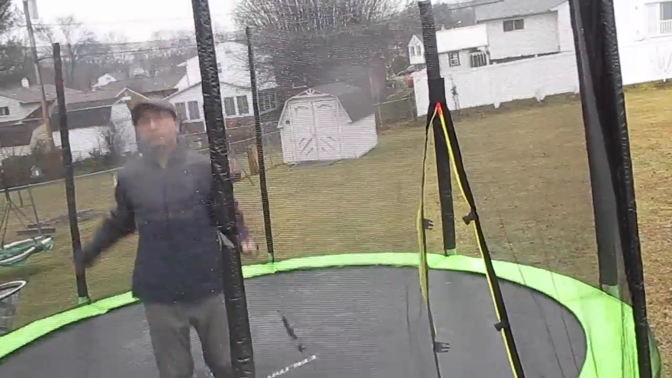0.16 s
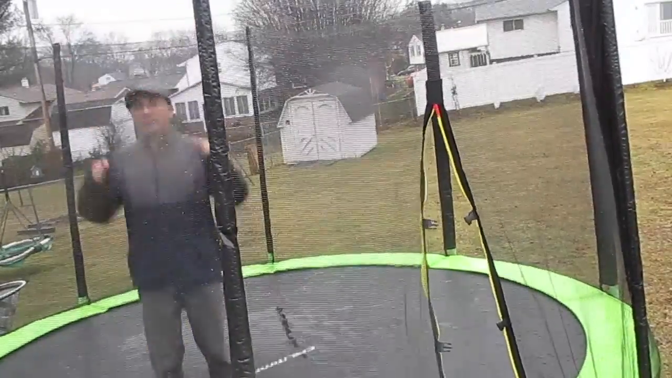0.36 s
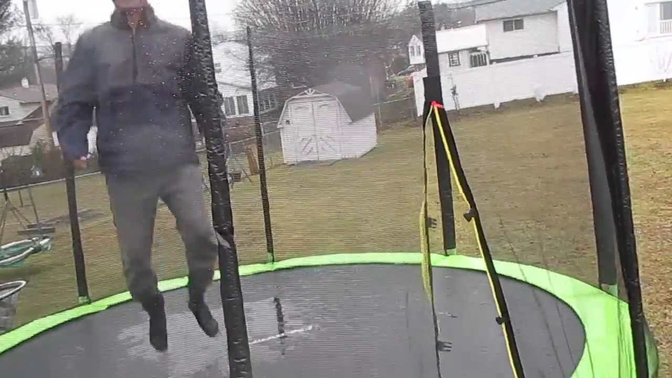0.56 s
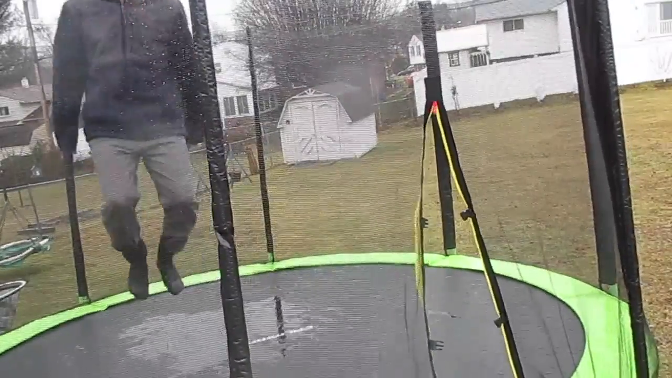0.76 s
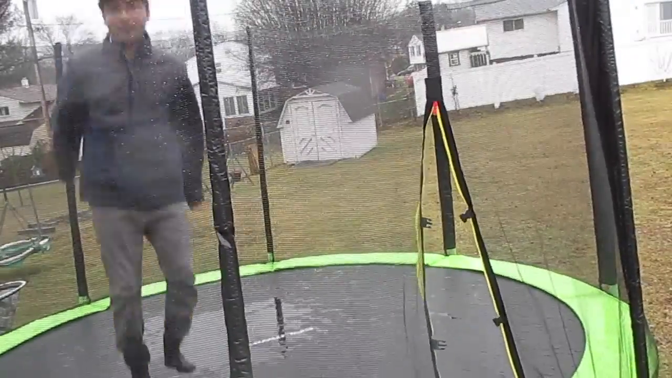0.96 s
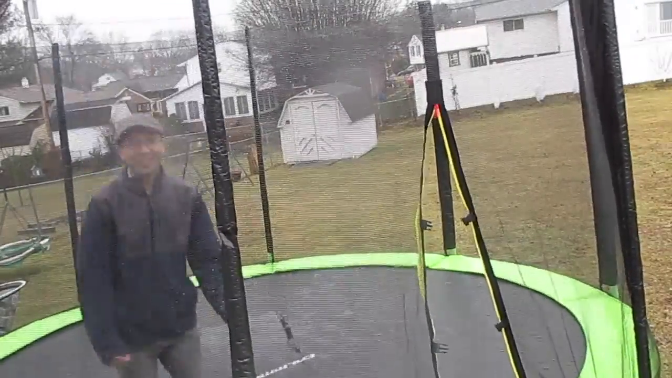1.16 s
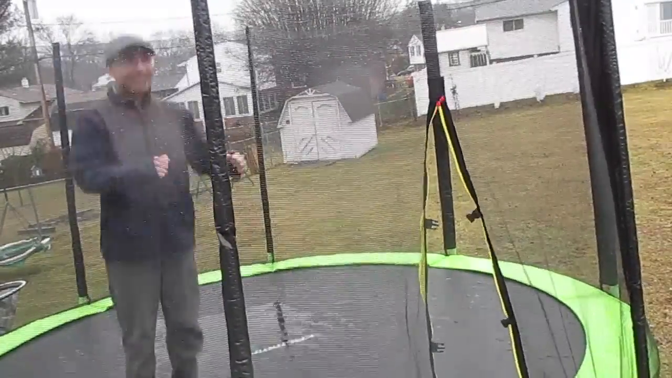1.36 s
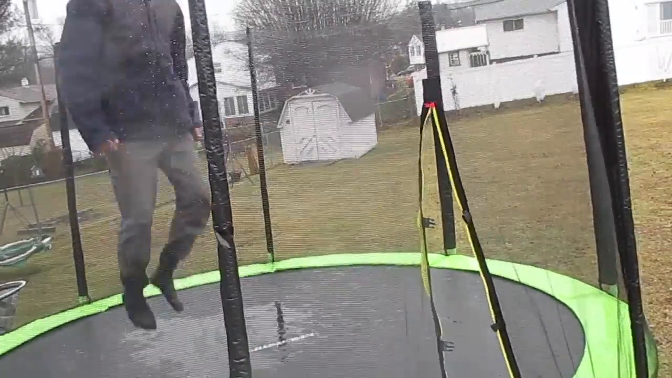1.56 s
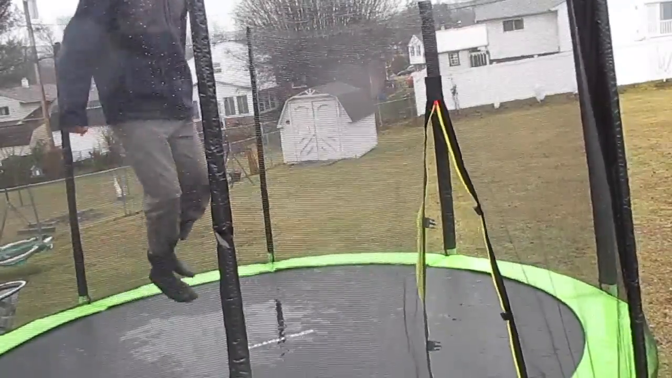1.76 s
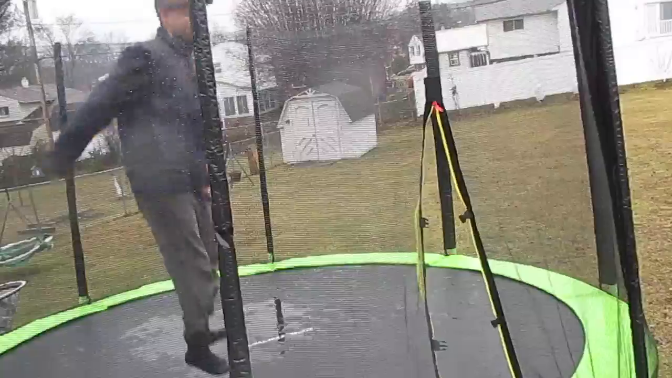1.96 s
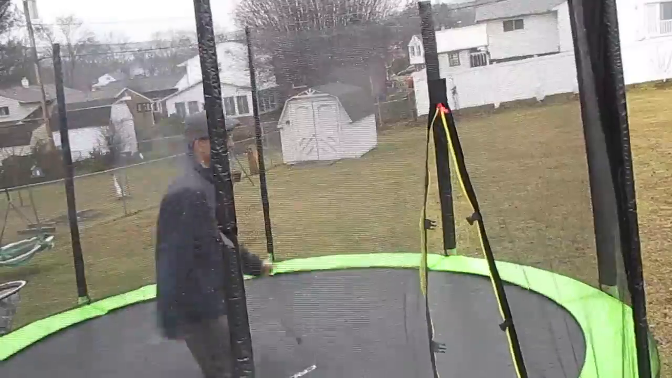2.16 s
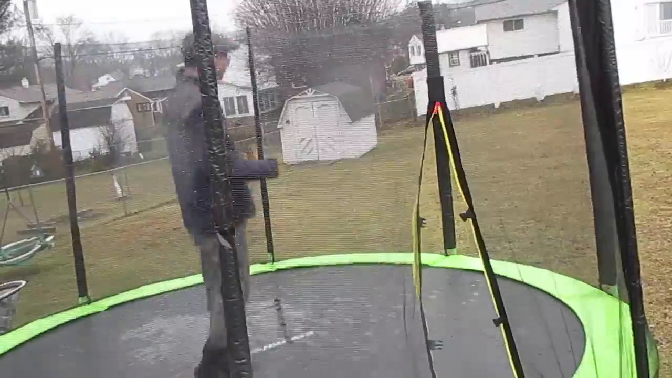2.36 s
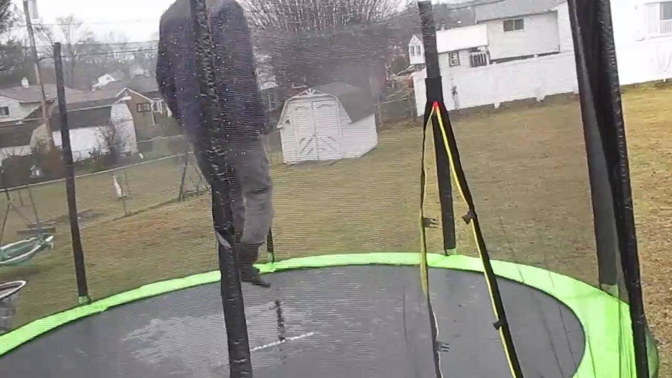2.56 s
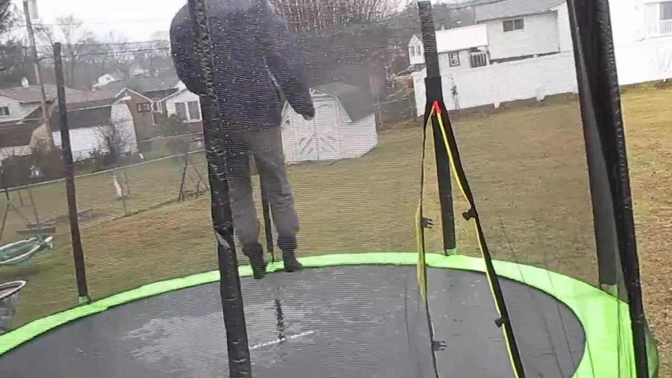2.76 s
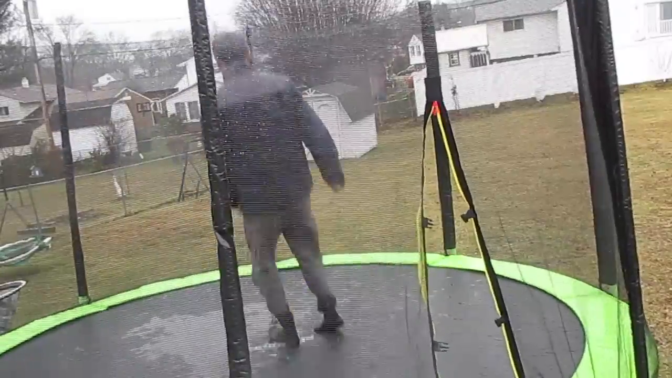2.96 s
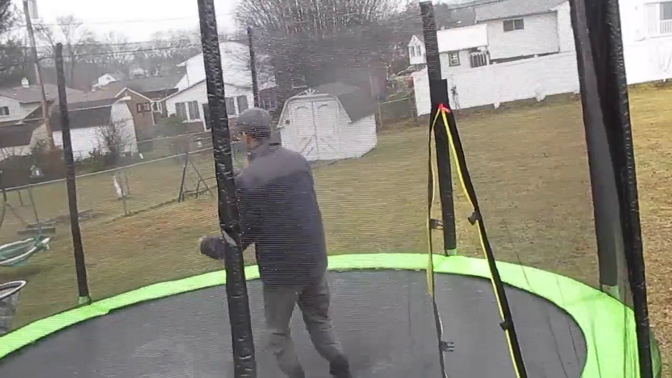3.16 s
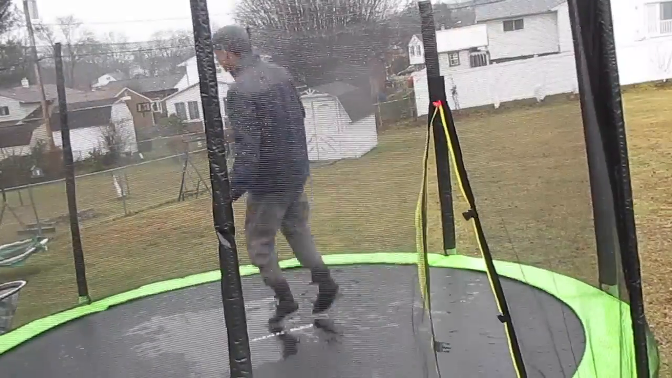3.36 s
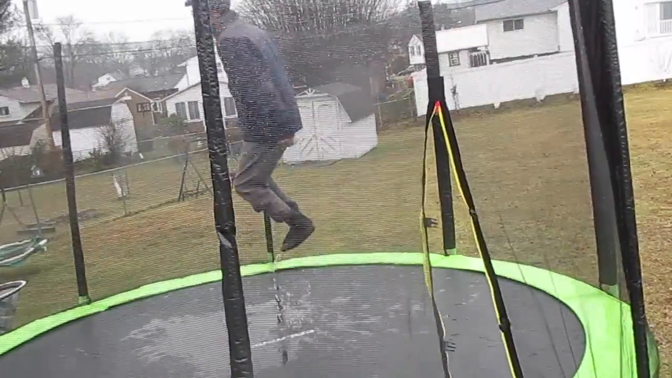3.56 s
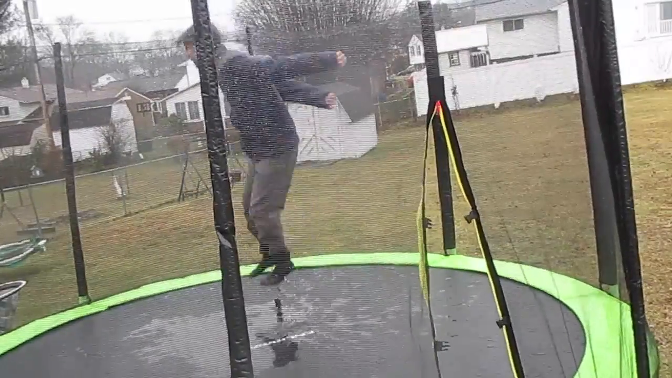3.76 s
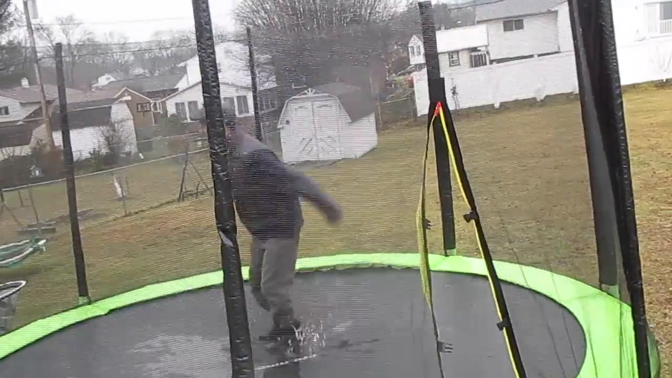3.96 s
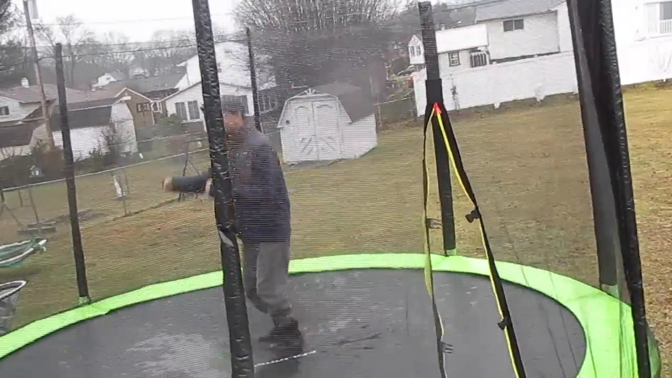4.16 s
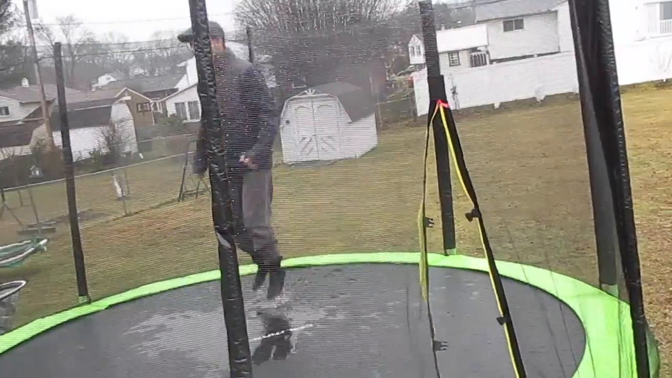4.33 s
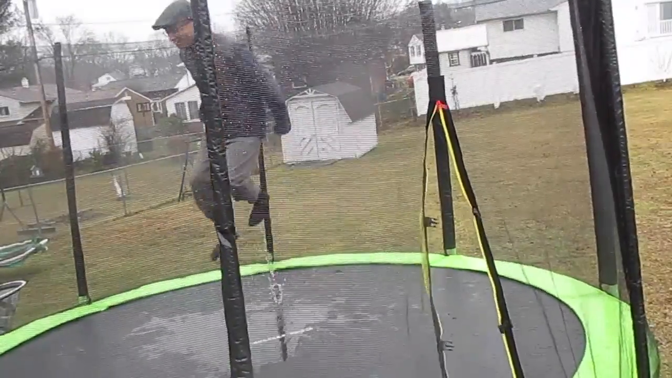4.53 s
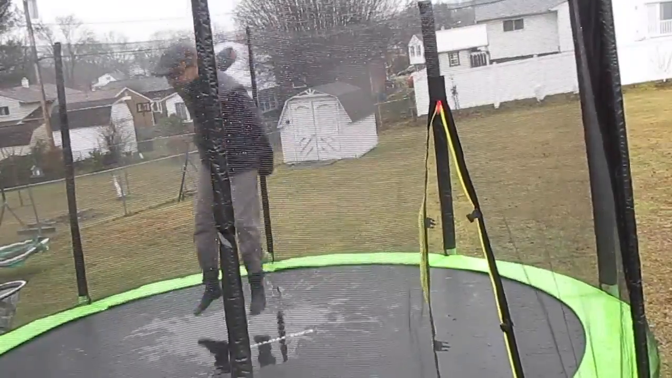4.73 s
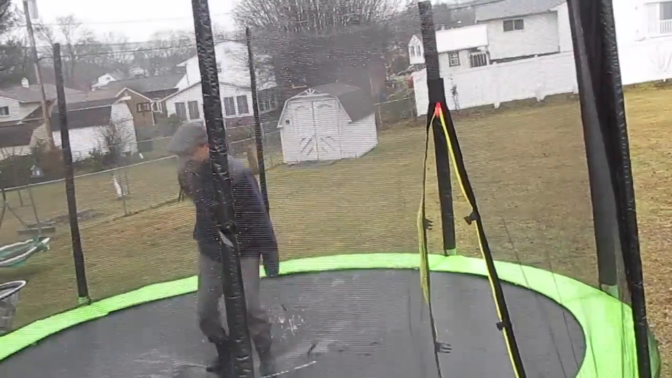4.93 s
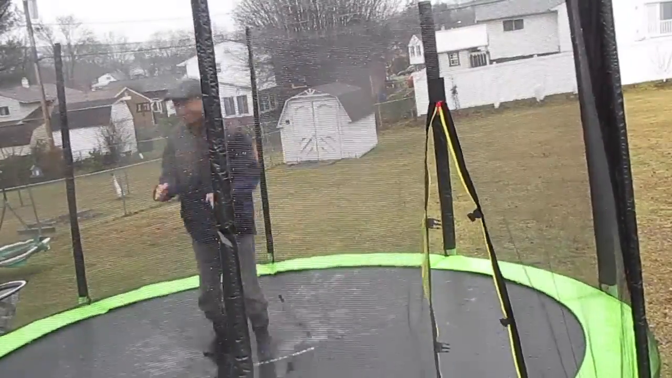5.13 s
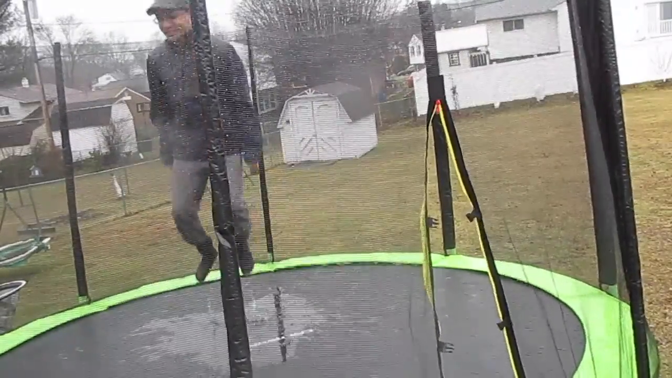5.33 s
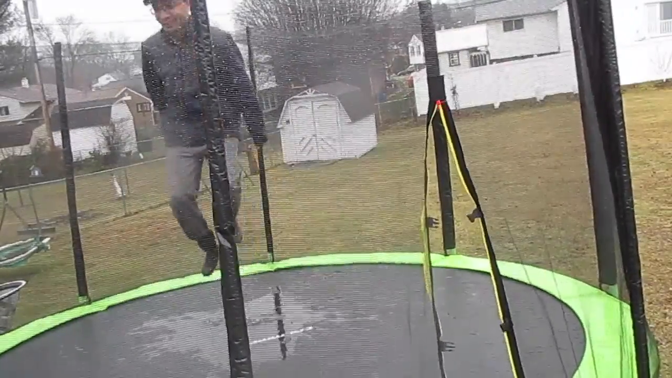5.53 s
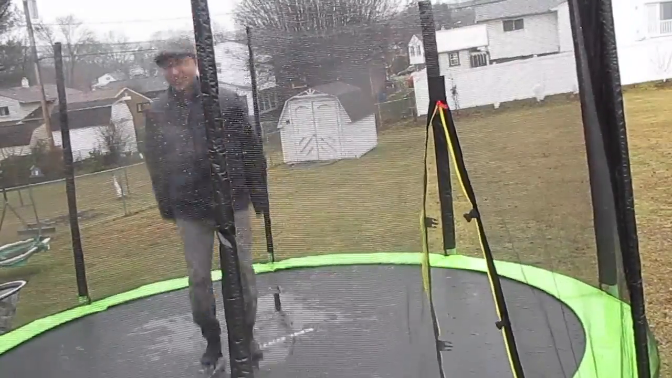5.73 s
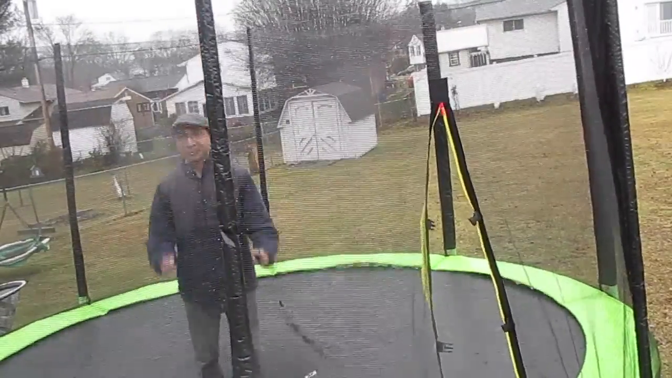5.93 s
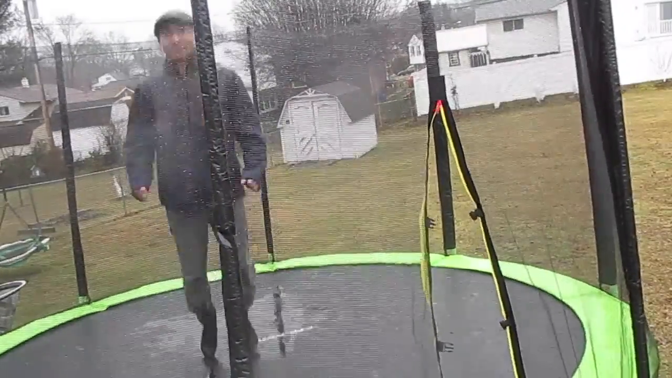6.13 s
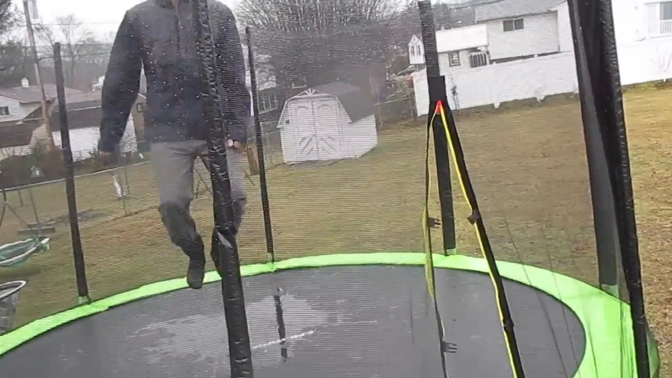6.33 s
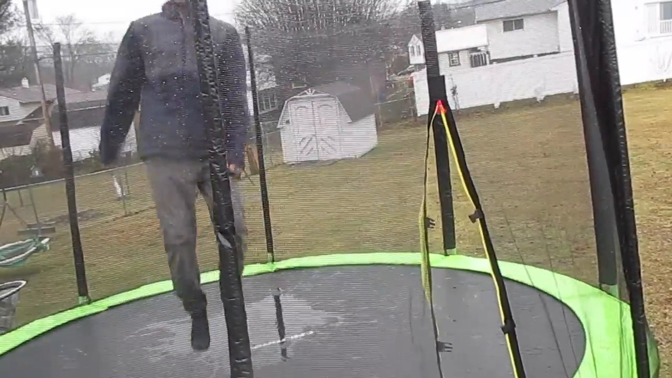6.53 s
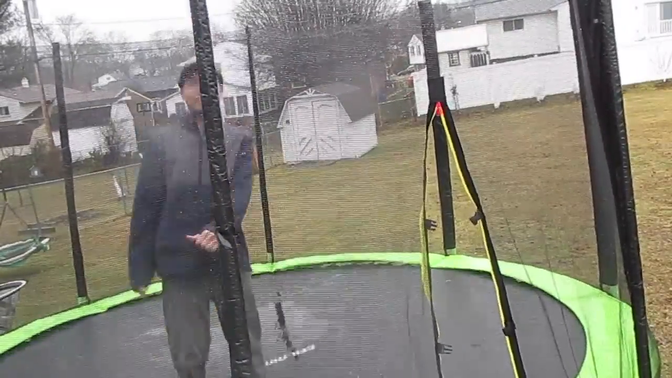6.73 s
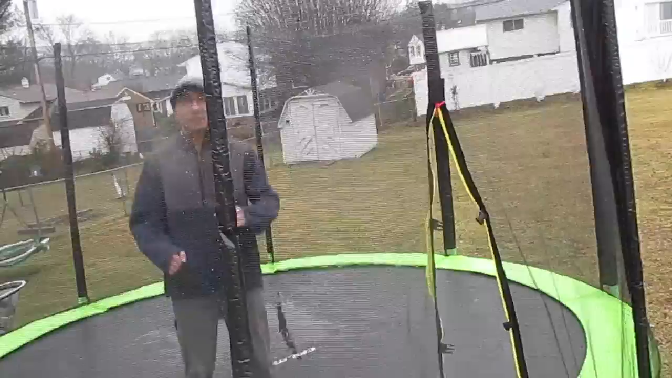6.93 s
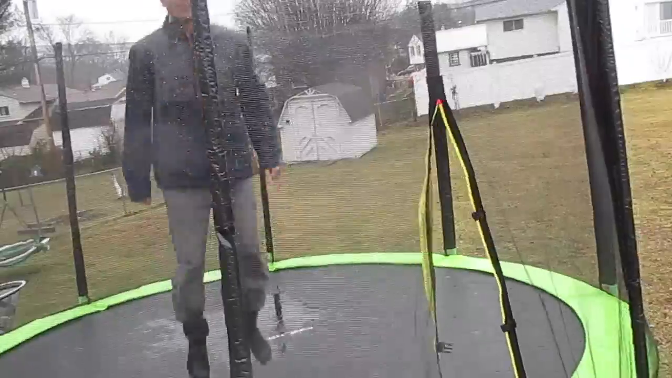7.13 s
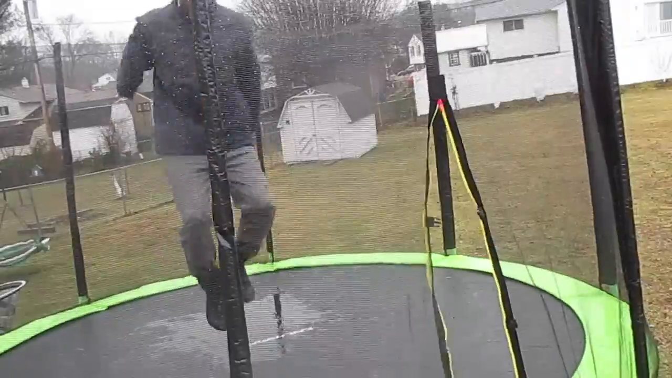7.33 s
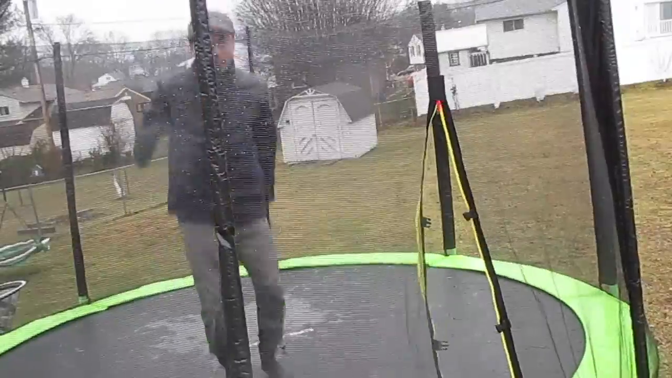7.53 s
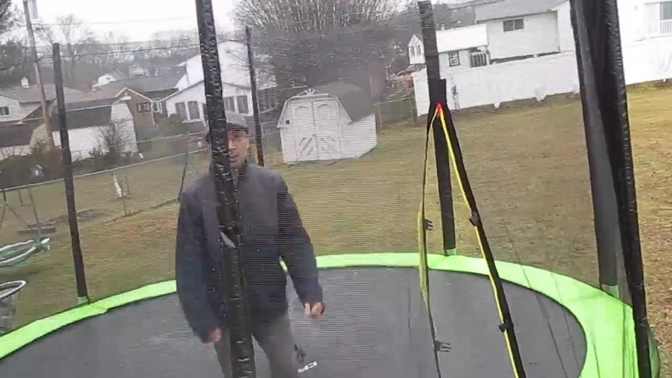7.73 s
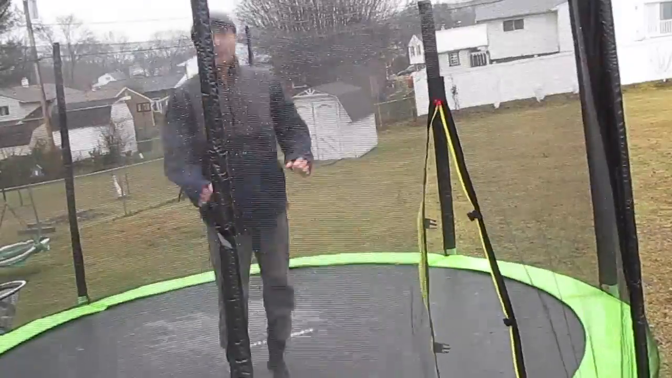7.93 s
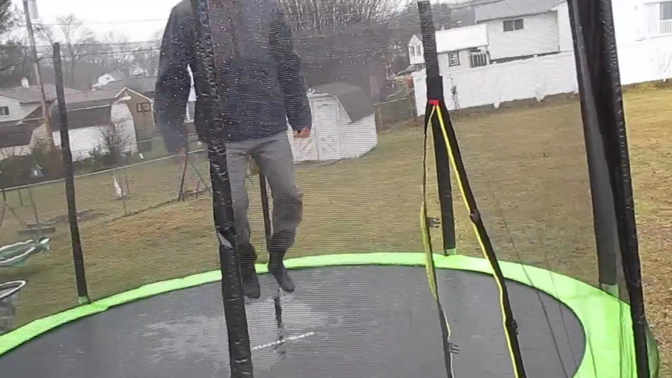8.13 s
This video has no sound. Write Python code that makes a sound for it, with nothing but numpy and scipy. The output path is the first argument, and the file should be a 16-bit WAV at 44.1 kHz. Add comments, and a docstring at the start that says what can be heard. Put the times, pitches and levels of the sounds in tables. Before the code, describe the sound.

A soaked trampoline in a back yard, heard close up in mono. The first bounces are softer, with wind thuds; from three seconds the landings boom harder and splash more. Springs rasp and clank as the mat sinks, and loosely jangle as it rises. Rain ticks on the mat, tiny drips ping on the steel frame, and distant air hums dully.

```python
"""A man's feet land on a rain-soaked trampoline in a back yard: a modal boom, a wet slap and a water knock.
The stretching steel springs creak and snap by stick-slip, and jingle as the mat rises.
The puddle claps into the dip and washes back; flung water, heard as noise and droplets, falls again.
Drops patter on the mat and ring the frame's modes; drifting noise eddies buffet the microphone.
Shaped noise makes the dull wash of the neighbourhood."""
import sys
import numpy as np
from scipy import signal
from scipy.io import wavfile
from scipy.ndimage import uniform_filter1d, map_coordinates

SR = 44100
rng = np.random.default_rng(int(sys.argv[2]) if len(sys.argv) > 2 else 0)


def unload_audio(sound):
    """Save the sound as a 16-bit wav file, at the path given as the first command line argument."""
    columns = np.transpose(np.atleast_2d(sound))
    # keep every value between -1 and 1, then stretch to whole-number steps
    steps = np.round(np.clip(columns, -1, 1) * 32767)
    wavfile.write(sys.argv[1], SR, steps.astype(np.int16))


N = 361090
T = np.arange(N) / SR  # time of every sample [s]
# All table levels are relative: each layer also has gains of its own.


def amp(db):
    """Decibel law: level to amplitude factor."""
    return 10 ** (np.asarray(db) / 20)


def evened(x):
    """Normalisation to unit mean power."""
    return x / np.sqrt(np.mean(x ** 2) + 1e-20)


def add(mix, s, sound):
    """Linear superposition: a sound joins the mix at time s."""
    part = mix[max(0, round(s * SR)):][:len(sound)]
    part += sound[:len(part)]


def level(curve):
    """Linear interpolation in dB: gain at every sample from rows (time [s], level [dB])."""
    return amp(np.interp(T, *np.transpose(curve)))


def swell(s, rise_s, fall_s):
    """Exponential growth and decay: gain of a motion that builds up to 1 at time s and dies away."""
    return np.exp(-np.minimum(np.maximum((s - T) / rise_s, (T - s) / fall_s), 20))


def colour(x, points):
    """Minimum-phase filtering: causal, with the given spectrum and unit power gain."""
    hz, db = np.transpose(points)
    bin_hz = abs(np.fft.fftfreq(4096, 1 / SR))
    log_gain = np.log(amp(np.interp(np.log(bin_hz + 1), np.log(hz), db)))
    # the Hilbert transform of the log gain gives the minimum phase
    spectrum = np.exp(np.conj(signal.hilbert(log_gain)))
    taps = np.fft.ifft(spectrum).real[:len(log_gain) // 2]
    return signal.oaconvolve(x, taps / np.linalg.norm(taps))[:len(x)]


def wander(hz):
    """Slow random fluctuation of unit power, changing about hz times a second."""
    knots = np.arange(0, T[-1] + 1, .5 / hz)
    return evened(np.interp(T, knots, rng.standard_normal(len(knots))))


def clicks(per_s, spread_db):
    """Poisson-like impulse process: random clicks of uneven size, unit power."""
    at = np.flatnonzero(rng.random(N) < per_s / SR)
    size_db = spread_db * np.minimum(rng.exponential(1, len(at)), 4)
    out = np.zeros(N)
    out[at] = rng.choice([-1, 1], len(at)) * amp(size_db)
    return evened(out)


def ring(modes, detune=0.):
    """Modal impulse response: dying sines of random sign, each a little off its pitch."""
    t = T[:SR // 4]
    out = np.zeros(len(t))
    for hz, db, t60 in modes:
        sign = rng.choice([-1, 1])
        pitch = hz * (1 + detune * rng.standard_normal())
        out += sign * amp(db - 60 * t / t60) * np.sin(2 * np.pi * pitch * t)
    return out


def burst(rise, decay):
    """Transient turbulence: a puff of noise that swells and dies [s], about unit level at its top."""
    t = T[:SR // 4]
    shape = (1 - np.exp(-t / rise)) * np.exp(-t / decay)
    return shape / shape.max() * rng.standard_normal(len(t))


# spectrum of the neighbourhood: (frequency [Hz], density [dB per Hz])
YARD_SPECTRUM = [(20, -38), (65, -9), (140, -6), (260, -5), (520, -7.5), (850, -7.5), (1600, -14.5),
                 (2400, -23), (5000, -33.5), (11000, -37), (15000, -86)]


def yard(gain_db=-41):
    """Diffuse ambience: stationary noise shaped to a dull, even wash."""
    return amp(gain_db) * colour(rng.standard_normal(N), YARD_SPECTRUM)


# air moving past the microphone: (time [s], level [dB])
WIND_CURVE = [(0.0, -31), (0.23, -30), (0.48, -41), (1.48, -39), (2.16, -23), (2.49, -25), (2.73, -39),
              (3.01, -39), (3.15, -31), (3.3, -37), (4.72, -41), (4.86, -37), (5.66, -41), (5.91, -36),
              (6.54, -41), (6.82, -34), (7.73, -30), (8.19, -40)]
# the strongest buffets: (middle [s], level [dB], standard deviation of the bell [s], air speed [factor])
WIND_BUFFETS = [(.032, -10.5, 0.0025, 1.36), (0.063, -17.5, 0.0059, 1.58), (.088, -11.5, 0.0025, 2.1),
                (0.192, -15, 0.0061, 1.01), (.279, -13, 0.0043, 1.09), (0.325, -18.5, 0.0071, 1.73),
                (0.384, -20, 0.03, 1.16), (.756, -22.5, 0.01, 0.72), (1.856, -20, .012, .7),
                (1.926, -13, 0.011, 1.08), (2.005, -8, 0.0045, 1.14), (2.018, -9, 0.012, 1.58),
                (2.142, -10, 0.0057, 1.7), (2.166, -13.5, 0.01, 1.7), (2.335, -12, 0.032, 0.99),
                (2.471, -9.5, 0.0057, 1.55), (2.58, -22.5, .06, .7), (3.069, -14, .009, 0.6),
                (7.147, -17.5, 0.0044, 0.79), (7.258, -14.5, 0.0045, 1.45), (7.364, -12.5, .0072, 1.27),
                (7.449, -20, 0.018, 0.85), (7.584, -13, 0.0098, .75), (7.617, -14, .016, 1.03),
                (7.886, -20, 0.011, 1.13), (7.941, -14, 0.0086, 1.18)]
# spectrum of the eddies before they are swept past: (frequency [Hz], density [dB per Hz])
EDDY_SPECTRUM = [(20, -13.5), (50, -2), (110, 1.5), (210, -6.5), (340, -15), (600, -33.5), (1200, -65.5),
                 (3000, -86)]
# the swaying mat fans the air; its peak is counted from the landing
SWAY_S, SWAY_DB, SWAY_RISE_S, SWAY_FALL_S = 0.133, -42, 0.079, .25


def wind(steady_db=0.5, buffet_db=0, usual_db=-27, quickening=.05, lump_db=2.5):
    """Frozen turbulence: eddies of breeze and swaying mat; faster air sweeps them past sooner, so brighter."""
    eddies = colour(rng.standard_normal(2 * N), EDDY_SPECTRUM)
    eddies /= np.sqrt(uniform_filter1d(eddies ** 2, size=900) + 0.0057)  # eddies of like strength
    sway = amp(SWAY_DB) * sum(swell(s + SWAY_S, SWAY_RISE_S, SWAY_FALL_S) for s, *_ in LANDINGS)
    lumps = amp(steady_db + lump_db * wander(hz=16.2))
    force = lumps * np.hypot(level(WIND_CURVE), sway)
    drift = 0.88 * (force / amp(usual_db)) ** quickening  # eddy samples passed per output sample
    out = force * map_coordinates(eddies, [np.cumsum(drift)], order=1, mode="wrap")
    for s, db, half, speed in WIND_BUFFETS:
        t = np.arange(-3 * half, 3 * half, 1 / SR)
        bell = np.exp(-.5 * (t / half) ** 2)
        path = rng.uniform(SR, N) + speed * SR * t
        gust = bell * map_coordinates(eddies, [path], order=1)
        add(out, s + t[0], amp(db + buffet_db) * evened(gust) * np.sqrt(np.mean(bell ** 2)))
    return out


# spectrum of fine drops: (frequency [Hz], density [dB per Hz])
SPRAY_SPECTRUM = [(300, -12), (1200, 11.5), (3000, 6), (5500, 1), (11000, -4), (15000, -9)]


def droplets(per_s, cycles=2., spread_db=9.5, count=24):
    """Damped oscillation: many small drops, each a few cycles at one of count pitches; unit power."""
    t, out = T[:SR // 50], np.zeros(N)
    for hz in np.geomspace(1500, 12000, count):
        age = t * hz / cycles
        drop = np.exp(-age) * np.sin(2 * np.pi * hz * t)
        out += signal.oaconvolve(clicks(per_s / count, spread_db), hz * drop)[:N]
    return evened(colour(out, SPRAY_SPECTRUM))


# big drops nearby: (time [s], level [dB], pitch [Hz])
BIG_DROPS = [(0.266, -28, 2830), (1.8454, -25, 10700), (3.3333, -25, 3540), (4.226, -24, 2930),
             (4.4752, -24.5, 10600), (4.7323, -30.5, 6500), (5.1347, -29.5, 3980), (5.6542, -30.5, 4570),
             (7.2353, -26.5, 10500)]
RAIN_DB = -56
# fine spray flung up by the mat comes down; its peak is counted from the landing
SPRAY_S, SPRAY_DB, SPRAY_SPREAD_S = 0.4, -51, .14


def rain(patter_db=-.5, fizz_db=-6.0, plink_db=-3, tick_db=-7, plink_s=0.0013):
    """Superposed drop impacts: fine patter, louder as spray comes down, and big drops that tick and plink."""
    spray = sum(swell(s + SPRAY_S, SPRAY_SPREAD_S, SPRAY_SPREAD_S) for s, *_ in LANDINGS)
    shower = amp(RAIN_DB) + amp(SPRAY_DB) * spray
    ticks = amp(fizz_db) * shower * clicks(per_s=2500, spread_db=4)
    plinks, t = np.zeros(N), T[:SR // 20]
    for s, db, hz in BIG_DROPS:
        add(ticks, s, amp(db + tick_db) * burst(rise=.0002, decay=.0022))
        add(plinks, s, amp(db + plink_db) * np.exp(-t / plink_s) * np.sin(2 * np.pi * hz * t))
    patter = shower * droplets(per_s=700, cycles=2.2, spread_db=3.8)
    return colour(ticks, SPRAY_SPECTRUM) + plinks + amp(patter_db) * patter


# drips strike the steel frame: (time [s], level [dB])
FRAME_DRIPS = [(0.633, -33.5), (1.8457, -29), (2.0765, -36), (2.5611, -33), (3.5104, -32.5), (4.244, -24),
               (4.4752, -31), (5.449, -32), (5.653, -38), (7.013, -28.5), (7.123, -35), (7.202, -34),
               (8.1314, -36.5)]
# modes of the steel frame: (frequency [Hz], level [dB], 60 dB decay time [s])
STEEL_MODES = [(4484, -15, .11), (7660, -16, .11), (10685, 0, .09)]
SHAKEN_S = (.25, .75)  # each bounce shakes drips onto the frame: earliest and latest after the landing


def frame(ping_db=-5, faint_db=-48.0, spread_db=3, count=9):
    """Modal excitation: drips stir close pairs of steel modes unevenly; each bounce shakes more loose."""
    out = np.zeros(N)
    onset = 1 - np.exp(-T[:SR // 4] / 0.00014)  # water lands softly
    drips = list(FRAME_DRIPS)
    for landing, *_ in LANDINGS:
        for _ in range(count):
            drips.append((landing + rng.uniform(*SHAKEN_S), faint_db + spread_db * rng.standard_normal()))
    for s, db in drips:
        modes = [(hz, d + 2 * rng.standard_normal(), t60) for hz, d, t60 in STEEL_MODES]
        pair = ring(modes, detune=0.00507) + ring(modes, detune=0.00495)
        add(out, s, amp(db + ping_db) * onset * pair)
    return out


# spectrum of sloshing water: (frequency [Hz], density [dB per Hz])
WATER_SPECTRUM = [(50, 2), (200, 5.5), (500, -2.5), (1100, -10), (3000, -11.5), (6000, -21), (10500, -26),
                  (15000, -46)]
# the puddle runs into the dip, claps together at the lowest point, then washes back
SLOSH_DB, SLOSH_RISE_S, SLOSH_FALL_S = -5, 0.023, 0.027
CLAP_RISE_S, CLAP_FALL_S = 0.0042, 0.013
BACKWASH_S, BACKWASH_DB, BACKWASH_SPREAD_S = 0.11, -17, 0.038  # counted from the lowest point
FALLBACK_S, FALLBACK_SPREAD_S = 0.573, 0.019  # the bulk of the flung water, counted from the landing


def puddle(gain_db=0.0, spray_db=-14, spray_s=0.059, ripple_db=4, ripple_hz=25):
    """Splash noise under summed powers: water claps, washes back and falls again, scattering droplets."""
    surge, ripples = np.zeros(N), evened(amp(ripple_db * wander(hz=ripple_hz)))
    for s, _, sink_s, *_, slosh_db, fallback_db in LANDINGS:
        lowest = s + sink_s
        clap = swell(lowest, CLAP_RISE_S, CLAP_FALL_S)
        run_in = amp(SLOSH_DB) * swell(lowest + CLAP_FALL_S / 2, SLOSH_RISE_S, SLOSH_FALL_S)
        backwash = swell(lowest + BACKWASH_S, BACKWASH_SPREAD_S, BACKWASH_SPREAD_S)
        backwash *= amp(BACKWASH_DB) * ripples
        surge += amp(slosh_db) * np.sqrt(clap ** 2 + run_in ** 2 + backwash ** 2)
        surge += amp(fallback_db) * swell(s + FALLBACK_S, FALLBACK_SPREAD_S, FALLBACK_SPREAD_S)
    # droplets lag behind the surge and linger
    keep = np.exp(-1 / (spray_s * SR))
    scatter = signal.lfilter([1 - keep], [1, -keep], surge)
    slosh = colour(surge * clicks(per_s=8000, spread_db=1.5), WATER_SPECTRUM)
    spray = scatter * droplets(per_s=3500, cycles=1.2, spread_db=4.3)
    return amp(gain_db) * slosh + amp(spray_db) * spray


def coils(modes, detune, count=4):
    """Modal density: neighbouring springs, none quite alike, answer with a clank of unit energy."""
    clank = sum(ring(modes, detune) for _ in range(count))
    return clank / np.linalg.norm(clank)


# modes of a steel spring: (frequency [Hz], level [dB], 60 dB decay time [s])
COIL_MODES = [(1288, -6.5, 0.077), (1660, -5.5, .07), (2416, -7, 0.13), (3020, -2.5, 0.051),
              (3590, -6.5, 0.036), (4000, -10, 0.056), (4270, -12, 0.068), (4960, -16, 0.15),
              (5870, -9, 0.076), (6630, -7.5, 0.047), (7055, 0.5, 0.062), (7870, -1.5, 0.038),
              (8770, -5, 0.038), (9650, -5.5, 0.037), (10050, -8, 0.044), (13100, -15, 0.092)]


def modes_near(centre_hz, db_per_octave):
    """Selective excitation: the modes of a spring, those near one pitch stirred most."""
    return [(hz, db - db_per_octave * abs(np.log2(hz / centre_hz)), t60) for hz, db, t60 in COIL_MODES]


# a spring hook slips at once: (time [s], level [dB], frequency around which the coil rings most [Hz])
HOOK_SNAPS = [(0.127, -29, 3260), (0.2125, -23, 3060), (1.161, -19, 4340), (1.2221, -9.5, 3020),
              (1.43, -27, 2450), (2.203, -30, 2230), (2.333, -26.5, 5000), (3.075, -15.5, 6780),
              (3.192, -24, 2450), (3.4453, -23.5, 2200), (5.8575, -21, 4150), (6.1764, -20.5, 2900),
              (6.726, -21, 3300), (6.745, -19, 4500), (6.8428, -9, 2900), (7.0784, -27, 2700),
              (7.7546, -12.5, 3050)]
# spectrum of a hook rasping in its ring: (frequency [Hz], density [dB per Hz])
HOOK_SPECTRUM = [(200, 2.5), (700, -7.5), (1500, -7.5), (3200, -7.5), (4300, -7.5), (5400, -13),
                 (9500, -18.5), (12000, -19), (15000, -49)]


def snaps(dry_db=-10, ring_db=-10.5, focus_db=11, slip_s=0.0047):
    """Sudden slip: a loaded hook rasps; a hard slip rings every mode, a soft one mainly those near one pitch."""
    rasps, rings = np.zeros((2, N))
    for s, db, centre in HOOK_SNAPS:
        slip = amp(db) * burst(rise=.003, decay=slip_s)
        modes = modes_near(centre, focus_db * amp(-25.5 - db))
        add(rasps, s, slip)
        add(rings, s, signal.oaconvolve(slip, coils(modes, detune=.015)))
    return amp(dry_db) * colour(rasps, HOOK_SPECTRUM) + amp(ring_db) * rings


# the springs creak as they stretch, and again as they slacken (slackening peak counted from the landing)
STRETCH_RISE_S, STRETCH_FALL_S = 0.036, 0.051
SLACKEN_S, SLACKEN_RISE_S, SLACKEN_FALL_S = 0.366, 0.084, 0.11


def springs(creak_db=-2, dry_db=-1, ring_db=-7, slack_dry_db=-2, slack_ring_db=-4.0,
            slack_hz=2500, slack_focus_db=6, count=5):
    """Stick-slip friction: hooks slip in clumps; stretched springs rasp, slackening ones jingle lower."""
    stretch, slack, rub, jangle = np.zeros((4, N))
    for s, _, _, creak_s, _, _, sink_db, rise_db, *_ in LANDINGS:
        stretch += amp(sink_db) * swell(s + creak_s, STRETCH_RISE_S, STRETCH_FALL_S)
        slack += amp(rise_db) * swell(s + SLACKEN_S, SLACKEN_RISE_S, SLACKEN_FALL_S)
    jerks = evened(amp(3 * wander(hz=50)))  # shared by all the springs
    for _ in range(count):
        slips = jerks * evened(amp(3 * wander(hz=40)) * clicks(per_s=150, spread_db=3.3))
        rasp = burst(rise=.0003, decay=.001)
        taut = coils(COIL_MODES, detune=.025, count=2)
        loose = coils(modes_near(slack_hz, slack_focus_db), detune=0.0404, count=2)
        rubbing = slips * (stretch + amp(slack_dry_db) * slack)
        rub += signal.oaconvolve(rubbing, rasp / np.linalg.norm(rasp))[:N]
        jangle += amp(ring_db) * signal.oaconvolve(slips * stretch, taut)[:N]
        jangle += amp(slack_ring_db) * signal.oaconvolve(slips * slack, loose)[:N]
    return amp(creak_db) / np.sqrt(count) * (amp(dry_db) * colour(rub, HOOK_SPECTRUM) + jangle)


# one row per bounce: (first foot meets the mat [s], second foot after that [s], lowest point after the
#   first foot [s], loudest creak after the first foot [s], boom [dB], slap [dB], creak on sinking [dB],
#   jingle on rising [dB], slosh [dB], water falling back [dB])
LANDINGS = [(.078, 0.032, 0.17, .12, -28, -40.5, -40, -41.5, -39, -42),
            (1.031, .029, .16, 0.14, -17.5, -37, -28, -34.5, -29, -28),
            (2.025, 0.047, 0.17, 0.09, -22, -29, -37.5, -38, -18, -32),
            (2.997, .004, .147, 0.099, -13.5, -26, -29, -45, -16, -34.5),
            (3.877, 0.0039, .15, 0.1, -17.5, -27, -36, -49, -19.5, -37),
            (4.807, .012, .152, 0.092, -14.5, -32, -37, -49, -15.5, -35),
            (5.761, .012, 0.1398, 0.12, -13.5, -22, -27, -45, -11.5, -32),
            (6.671, 0.0059, .15, .11, -12.5, -30, -28, -34.5, -24, -33.5),
            (7.566, 0.024, 0.17, 0.12, -16.5, -33.5, -30.5, -40, -20.5, -27)]
# modes of the taut mat: (frequency [Hz], level [dB], 60 dB decay time [s])
FABRIC_MODES = [(65, -6, 0.39), (106.7, -2, 0.17), (134, -4, 0.35), (182, -2.5, 0.26), (243, -5.5, 0.2),
                (315, -8, 0.15), (450, -9, 0.028)]
# spectra of the wet slap and of the knocked-out water: (frequency [Hz], density [dB per Hz])
SLAP_SPECTRUM = [(100, -68), (400, -4.5), (1000, 1), (3200, -3.5), (6000, -10), (11000, -14.5),
                 (15000, -29)]
KNOCK_SPECTRUM = [(50, -4.5), (230, -1), (700, -14), (2000, -27), (6000, -60)]
SECOND_FOOT_DB = -5  # relative to the first foot


def landings(boom_db=-1, slap_db=0, knock_db=-12, knock_s=0.033):
    """Struck membrane: wet soles slap, each booms the mat from its own spot and knocks water from under it."""
    booms, slaps, knocks = np.zeros((3, N))
    for first, lag, _, _, boom, slap, *_ in LANDINGS:
        for s, db in (first, 0), (first + lag, SECOND_FOOT_DB):
            drum = ring(FABRIC_MODES, detune=.08) + ring(FABRIC_MODES, detune=.08)
            add(booms, s, amp(db + boom + boom_db) * drum / abs(drum).max())
            add(slaps, s, amp(db + slap + slap_db) * burst(rise=.0004, decay=.007))
            add(knocks, s, amp(db + boom + knock_db) * burst(rise=0.002, decay=knock_s))
    return booms + colour(slaps, SLAP_SPECTRUM) + colour(knocks, KNOCK_SPECTRUM)


def scene():
    """Superposition of background, air, water, steel and mat in one channel."""
    background = yard() + wind()
    near = rain() + frame() + puddle() + snaps() + springs() + landings()
    return (background + near)[None]


EDGE_HZ = 15300  # upper band limit


def record(dry):
    """Soft saturation and band limiting: the microphone rounds off the highest peaks, then a low-pass."""
    rounded = dry / (1 + (dry / .8) ** 4) ** .25
    low_pass = signal.firwin(255, EDGE_HZ, window=("kaiser", 9), fs=SR)
    return signal.oaconvolve(rounded, low_pass[None], "same")


dry = scene()
out = record(dry)
unload_audio(out)
```